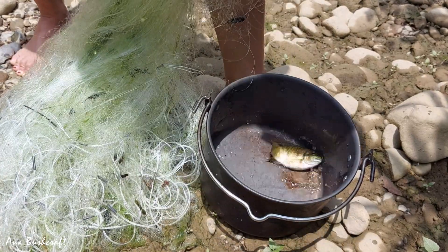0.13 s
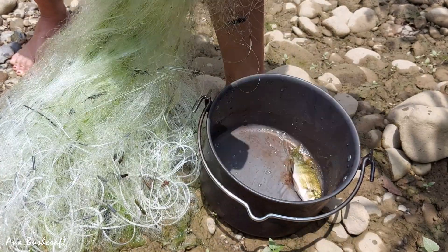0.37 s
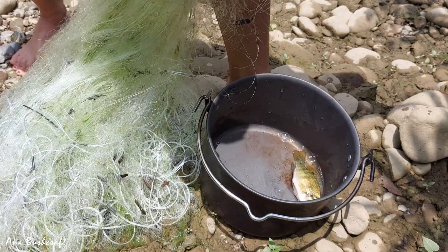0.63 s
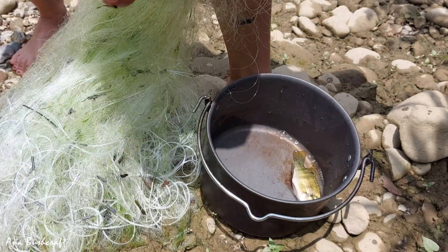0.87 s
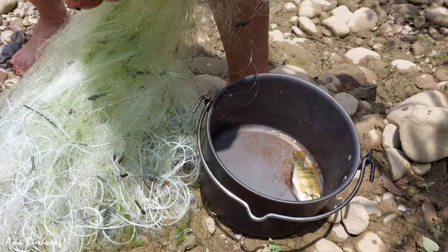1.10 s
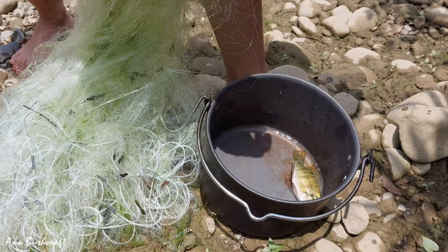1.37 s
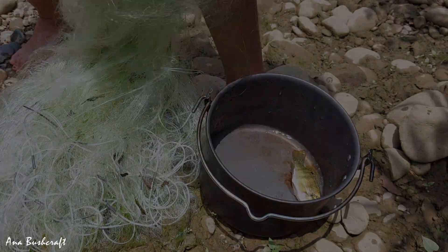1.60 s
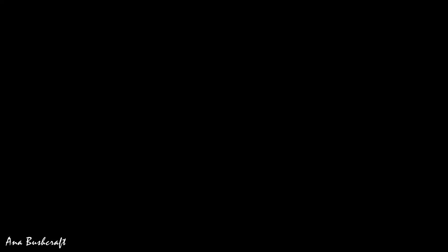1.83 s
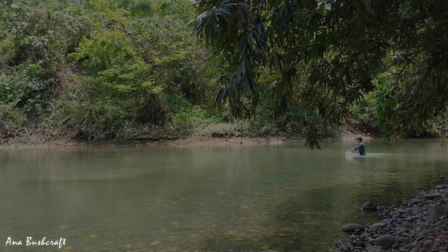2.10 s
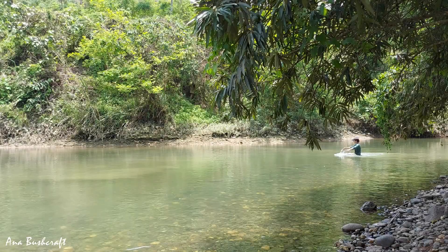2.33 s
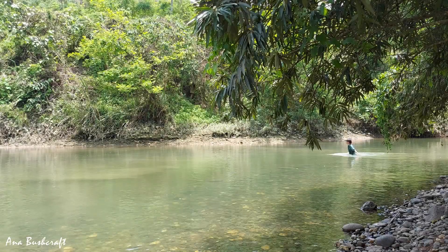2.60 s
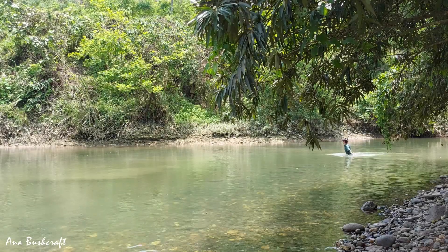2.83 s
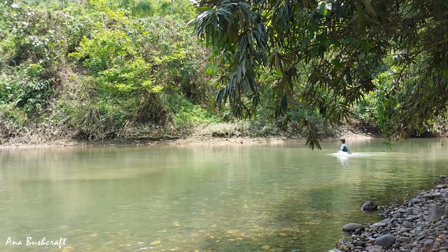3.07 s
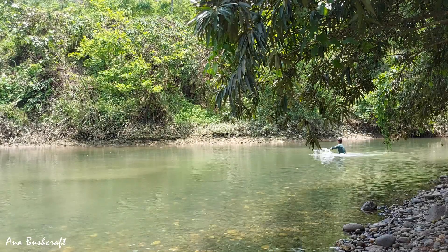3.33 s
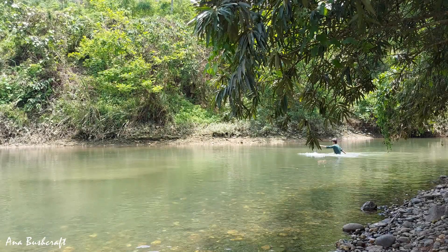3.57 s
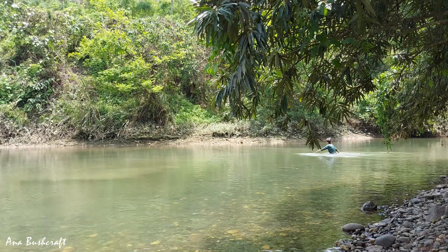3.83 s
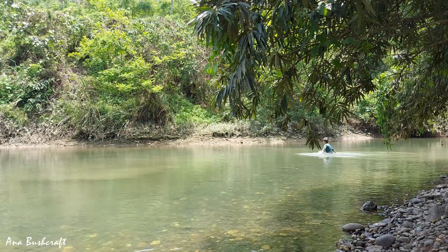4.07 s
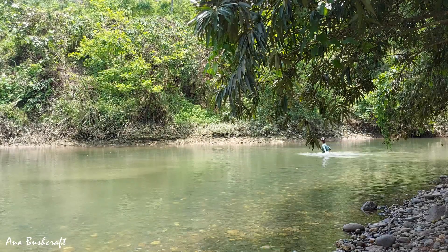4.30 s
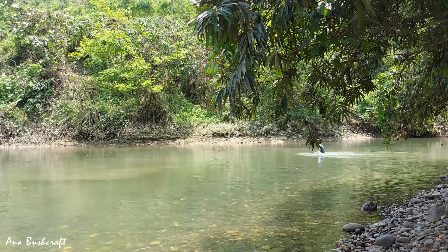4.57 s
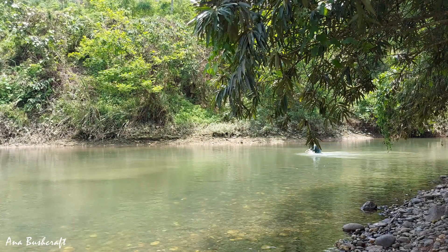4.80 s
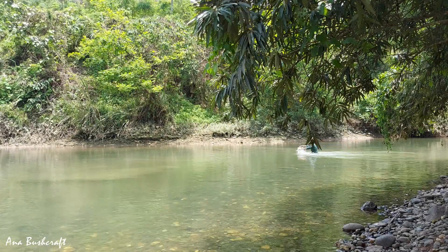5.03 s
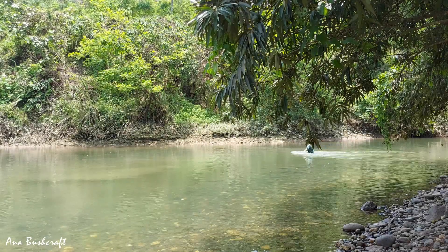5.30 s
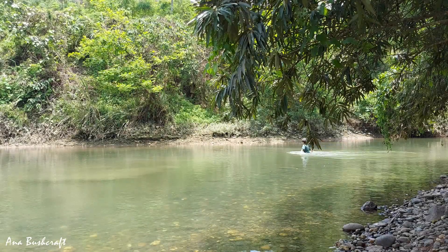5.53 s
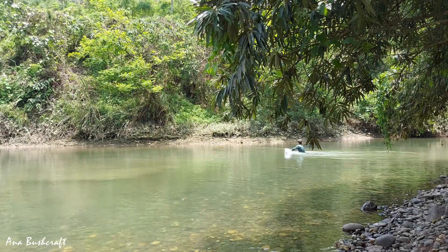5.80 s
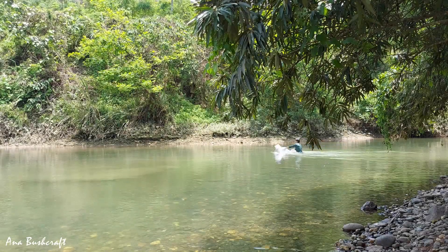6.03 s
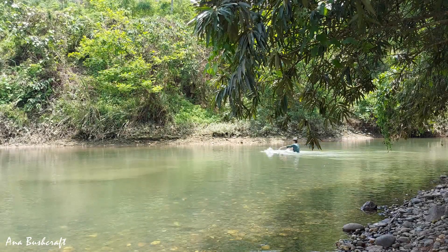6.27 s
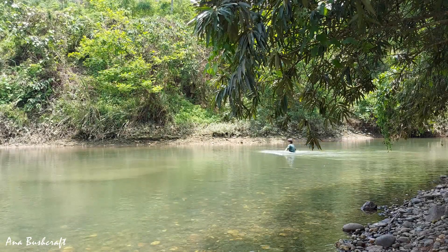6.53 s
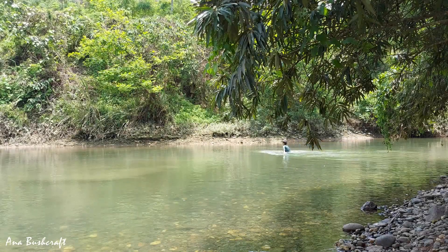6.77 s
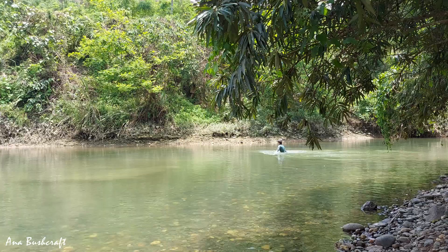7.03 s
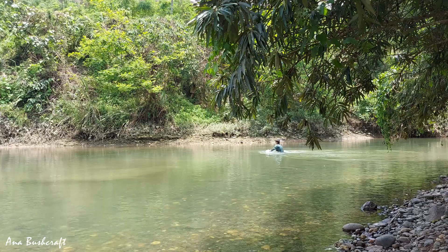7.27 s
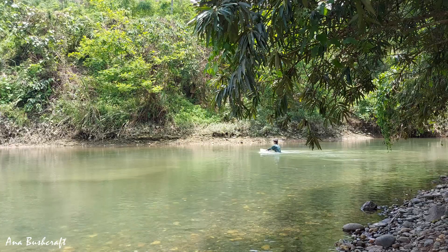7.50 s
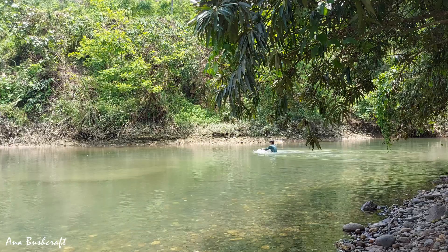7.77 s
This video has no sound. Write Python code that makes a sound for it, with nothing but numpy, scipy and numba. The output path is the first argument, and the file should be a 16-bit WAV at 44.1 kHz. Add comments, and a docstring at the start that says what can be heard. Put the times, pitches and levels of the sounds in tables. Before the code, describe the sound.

A small fish flaps hard in a metal pot as birds whistle and a net rustles, then distant wading sloshes and gurgles in a river.

```python
"""A stony river bank, then a wide view of the river.
On the bank a small fish flaps in a metal pot (ringing modes and wet noise slaps), birds whistle in the trees
(gliding sines with echoes) and a net scrapes and rustles (bursts of filtered noise). At the river someone wades
and works a net far off: clouds of bubble rings glug, slosh, fizz and spray while birds still call.
Shaped noise gives each place its hush, a thin cricket band throughout and an insect hiss over the river."""
import sys
import numpy as np
from scipy import signal
from scipy.fft import rfft, irfft
from scipy.io import wavfile
from scipy.ndimage import uniform_filter1d
from numba import njit

SR = 44100
rng = np.random.default_rng(int(sys.argv[2]) if len(sys.argv) > 2 else 0)


def elevation(decibels):
    """Turn decibel levels (scalar or array-like) into linear amplitude ratios."""
    levels = np.asarray(decibels, float)
    return 10 ** (levels / 20)


def bounce(signal):
    """Save signal as a 16-bit WAV file at the path given by the first command-line argument."""
    frames = np.transpose(np.atleast_2d(signal))
    limited = np.clip(frames, -1, 1)
    pcm = np.round(limited * 32767).astype(np.int16)
    wavfile.write(sys.argv[1], SR, pcm)


N = 347508
T = np.arange(N) / SR
CUT_S = 1.866  # the scene changes from the bank to the river


def unit(x):
    """Normalisation: scale to an rms of one."""
    return x / np.sqrt(np.mean(x ** 2))


def band(x, lo_hz, hi_hz, order=2):
    """Band-pass filtering: keep the spectrum between two corner frequencies."""
    corners = [lo_hz, min(hi_hz, .45 * SR)]
    return signal.sosfilt(signal.butter(order, corners, "bandpass", fs=SR, output="sos"), x)


def colour(x, points):
    """Spectral shaping: weight noise by (frequency [Hz], level [dB]) points, joined on a log axis."""
    hz, db = np.transpose(points)
    f = np.fft.rfftfreq(x.shape[-1], 1 / SR) + 1
    gain = elevation(np.interp(np.log(f), np.log(hz), db))
    return unit(irfft(rfft(x) * gain, x.shape[-1]))


def curve(table):
    """Envelopes: interpolate level columns in dB, near silent before the table, then holding its last value."""
    s, *columns = np.transpose(table)
    return [elevation(np.interp(T, s, db, left=-140)) for db in columns]


def bursts(rows):
    """Incoherent addition: events swell to a peak, decay exponentially, and their powers add."""
    power = 0
    for s, db, rise, t60 in rows:
        swell = np.clip(1 + (T - s) / (2 * rise), 0, 1) ** 2
        decay = np.exp(-np.log(1000) * np.maximum(T - s, 0) / t60)
        power = power + (elevation(db) * swell * decay) ** 2
    return np.sqrt(power)


def waver(rate_hz, depth_db):
    """Slow amplitude modulation: a smoothed random gain of the given rms depth."""
    k = int(SR / rate_hz)
    steps = rng.standard_normal(800).repeat(k)[:N]
    return elevation(depth_db * unit(uniform_filter1d(steps, k)))


def pan(x, db=0., lag=0):
    """Stereo cues: a level difference, left minus right, and a delay of the left by lag samples."""
    return np.array([np.roll(x, lag) * elevation(db / 2), x * elevation(-db / 2)])


def scatter(x, t60, build=0.003):
    """Diffuse scattering: many small echoes from leaves and banks build up and decay, unlike at each ear."""
    t = T[:int(.5 * SR)]
    envelope = np.exp(-np.log(1000) * t / t60) * (1 - np.exp(-t / build))
    tail = rng.standard_normal((2, len(t))) * envelope
    tail /= np.sqrt(np.sum(tail ** 2) / 2)
    return signal.fftconvolve(np.atleast_2d(x), tail, axes=1)[:, :N]


def stereo_noise(like_hz):
    """Interaural coherence: noise alike in both channels in the bass and unrelated in the treble."""
    mid, side = rng.standard_normal((2, N))
    side = signal.sosfilt(signal.butter(1, like_hz, "highpass", fs=SR, output="sos"), side)
    return np.array([mid + side, mid - side])


@njit
def rings(count, start, hz, t60, size, glide, swell, sr):
    """Damped oscillation: rings swell over some cycles; a bubble rises in pitch as it nears the surface."""
    out = np.zeros(count)
    for k in range(len(start)):
        n = int(t60[k] * sr)
        step, level, phase = 2 * np.pi * hz[k] / sr, size[k], 0.
        fade, rise = np.exp(-np.log(1000.) / n), (1 + glide[k]) ** (2 / n)
        for i in range(start[k], min(start[k] + n, count)):
            out[i] += level * np.sin(phase) * min(phase / (2 * np.pi * swell), 1.)
            phase += step
            level *= fade
            step = min(step * rise, 2.6)  # stays below half the sample rate
    return out


def ring(s, hz, t60, size, glide, swell):
    """Superposition: sum damped rings whose settings may each be one value or one per ring."""
    hz = np.asarray(hz, float)
    one = np.ones(len(hz))
    start = (s * SR * one).astype(np.int64)
    return rings(N, start, hz, np.maximum(t60 * one, .001), size * one, glide * one, swell, float(SR))


def froth(count, hz, octaves, cycles, spread_db, glide):
    """Bubble acoustics: a cloud of rings at random moments and sizes around a moving pitch."""
    when, up, size_draw, life, down = rng.random((count, 5)).T
    s = CUT_S + when * (T[-1] - CUT_S)
    centre_hz = (hz * np.ones(N))[(s * SR).astype(int)]
    pitch = np.minimum(centre_hz * 2 ** (octaves * (up - down)), .36 * SR)
    # a few bubbles are much larger than the rest
    size_db = np.minimum(-spread_db * np.log(size_draw + 1e-9), 4 * spread_db)
    size = elevation(size_db) * np.sqrt(pitch)  # short high rings count as much as long low ones
    return unit(ring(s, pitch, cycles * (.5 + life) / pitch, size, glide * life, swell=0.9))


def air():
    """Broadband ambience: shaped noise is each place's hush; narrow bands are cricket and insect hiss."""
    # spectrum of the hush on the bank: (frequency [Hz], density [dB per Hz])
    bank_shape = [(15, -40), (25, -7.5), (114, 0), (200, -11), (309, -6.5), (489, -14.5), (796, -15.5),
                  (2840, -21), (3920, -9), (4490, -13.5), (5570, -2), (7310, -21), (7920, -13),
                  (14000, -12), (16000, -23)]
    # spectrum of the hush at the river: (frequency [Hz], density [dB per Hz])
    river_shape = [(15, -43), (25, -16), (64, 8), (256, -2.5), (344, 8), (405, -13), (1330, 12.5),
                   (3340, 2), (4740, 7), (6210, -10.5), (6740, -42), (7710, -13), (8590, 3.5), (11900, -8),
                   (16000, -30)]
    # swelling insect hiss: (time [s], upper band level [dB], lower band level [dB])
    hiss_levels = [(1.87, -81.5, -67), (2.38, -87.5, -74), (2.52, -91, -72), (2.8, -97, -80.5),
                   (3.24, -90, -75), (3.56, -81.5, -77), (3.89, -105, -88), (4.24, -87, -75),
                   (4.44, -84.5, -63.5), (4.8, -81, -65.5), (5.25, -68, -63), (5.72, -68.5, -64),
                   (6.3, -67, -58), (6.57, -66.5, -63), (6.89, -66.5, -65), (7.88, -63.5, -67)]
    bank = elevation(-61.5) * colour(stereo_noise(150), bank_shape)
    river = elevation(-58.5) * colour(stereo_noise(130), river_shape)
    upper, lower = curve(hiss_levels)
    hiss = upper * unit(band(rng.standard_normal((2, N)), 15000, 15750))
    hiss += lower * unit(band(rng.standard_normal((2, N)), 10000, 14800))
    cricket_hz, cricket_db = 8560, -80
    cricket = unit(band(rng.standard_normal((2, N)), cricket_hz - 300, cricket_hz + 300))
    hiss_side = elevation(np.array([[-2.5], [2.5]]))  # stronger on the right
    return np.where(T < CUT_S, bank, river) + elevation(cricket_db) * cricket + hiss * hiss_side


def fish():
    """Modal excitation: each flap rings the pot, higher modes for harder blows, and leaves a bright wet slap."""
    # blows of the fish: (time [s], slap level [dB], pot ring level [dB], slap t60 [s],
    #                     left minus right of the slap [dB], hardness [dB per octave])
    flaps = [(.0005, -24.5, -29.5, 0.075, -0.5, -8.5), (0.025, -43, -34, 0.32, -2.5, -1.5),
             (0.0425, -29.5, -35.5, 0.038, -3, -2.5), (0.1316, -33.5, -38, 0.062, 1, -1.5),
             (0.144, -35.5, -47, 0.045, 1, -2), (0.1596, -21.5, -37.5, 0.061, 1, -2.5),
             (0.1922, -9, -17, 0.014, -4.5, 3), (0.2615, -36, -40.5, 0.057, -2, 6.5),
             (0.2673, -28, -51, 0.04, 2, 1.5), (0.317, -63, -54.5, .05, -11, 7)]
    # modes of the metal pot: (frequency [Hz], level [dB], t60 [s])
    pot_modes = [(286, -23, 0.33), (323, -9.5, 0.16), (339, -21, 0.12), (517.4, -7.5, 0.095),
                 (546, -18, 0.25), (780, -21.5, 0.16), (875, -21.5, 0.11), (1182, -10.5, 0.088),
                 (1224, -10.5, 0.11), (1340, -19.5, 0.042), (1592, -23.5, .05), (1803, -13, 0.066),
                 (2075, -13.5, 0.032), (2504, -18, .04), (2655, -13, 0.039), (2760, -19, 0.0211),
                 (3110, -20, 0.084), (3300, -30, .04)]
    # spectrum of the wet slap: (frequency [Hz], density [dB per Hz])
    slap_shape = [(710, -39), (1200, -2), (1660, -13.5), (2620, -4.5), (4650, -12.5), (5780, -9),
                  (6230, -14.5), (9310, -2.5), (11900, -3), (16000, -5.5)]
    out = np.zeros((2, N))
    hz, mode_db, t60 = np.transpose(pot_modes)
    shared = rng.standard_normal(N)
    slap = colour(shared + elevation(8) * rng.standard_normal((2, N)), slap_shape)
    slap *= elevation(0.38 * rng.standard_normal(N // 64 + 1)).repeat(64)[:N]  # the wet skin sputters
    for s, db, pot_db, slap_t60, pan_db, hard_db in flaps:
        after = np.maximum(T - s, 0)
        decay = np.exp(-np.log(1000) * after / slap_t60)
        weak_tail = elevation(-28.5) * np.exp(-after / 0.029)
        out += elevation(db) * slap * pan((T >= s) * (decay + weak_tail), pan_db)
        tilt_db = hard_db * np.log2(hz / 1000)
        struck = elevation(pot_db + mode_db + tilt_db + 0.78 * rng.standard_normal(len(hz)))
        out += pan(ring(s, hz, t60, struck, 0, swell=0.43), 2.0)
    return band(out, 130, 22000, order=1)


def birds():
    """Frequency glides: near-sine whistles, which the trees smear, the far ones almost wholly."""
    # kinds of whistled note: (length [s], from [Hz], to [Hz], bend [over 1 levels off, under 1 lingers at the
    #   start], loudest at [share 0-1], direct level [dB], left minus right [dB], echo t60 [s])
    note_kinds = [(0.115, 4000, 6200, 1.2, 0.21, -12.5, -1, 0.33),
                  (0.086, 3400, 7680, 1.3, 0.66, -6, -2.5, 0.1),
                  (0.036, 3500, 7650, 1.4, 0.77, 0, -5, 0.14), (.12, 5990, 5920, 1.1, 0.15, -20, 3, 0.4),
                  (.1, 6480, 8800, 0.398, 0.05, -16, -4.5, 0.69),
                  (0.06, 6000, 4300, 1.4, 0.15, -20, -2, 0.73), (0.095, 4640, 4570, 2.1, 0, -25, -6, 0.26)]
    # phrases of repeated notes: (first note [s], gap [s], growth of each gap [s], first level [dB], last level [dB])
    phrases = [(.078, .1275, .0003, -50.5, -53), (1.322, 0.136, 0.0029, -45, -49), (1.203, .1, 0, -51, -50),
               (2.199, .1, 0, -51.5, -51.5), (2.288, .154, .004, -53.5, -53), (3.45, .17, .07, -58, -54),
               (2.335, .155, .005, -50.5, -51.5), (3.96, .1, 0, -51, -50), (2.685, .166, 0.0056, -64, -60),
               (3.42, .28, 0, -54, -53.5), (3.77, .11, -.002, -59, -59.5)]
    # kind of note in each phrase: (row of note_kinds)
    phrase_kind = [0, 1, 2, 3, 4, 4, 5, 5, 6, 6, 6]
    # length of each phrase: (number of notes)
    phrase_notes = [11, 4, 1, 1, 7, 3, 6, 1, 4, 2, 5]
    warble_hz, flutter_db = 44.7, 3.5  # rms; far birds' notes wobble in pitch and are mottled in level
    wobble = unit(band(rng.standard_normal(N), 45, 480))
    flutter = unit(band(rng.standard_normal(N), 16, 60))
    out = 0
    for kind, (length, from_hz, to_hz, bend, loudest, direct_db, pan_db, t60) in enumerate(note_kinds):
        song = np.zeros(N)
        u = np.arange(int(length * SR)) / int(length * SR)
        peak_warp = np.log(.5) / np.log(np.maximum(loudest, .05))
        shape = np.sin(np.pi * u ** peak_warp) ** 1.07
        glide_hz = to_hz + (from_hz - to_hz) * (1 - u) ** bend
        far = direct_db < -12
        for (first, gap, longer, first_db, last_db), which, notes in zip(phrases, phrase_kind, phrase_notes):
            if which != kind:
                continue
            for k, db in enumerate(np.linspace(first_db, last_db, notes)):
                i = int((first + k * gap + longer * k * (k - 1) / 2) * SR)
                span = slice(i, i + len(u))
                hz = glide_hz + warble_hz * far * wobble[span]
                level = elevation(db + flutter_db * far * flutter[span])
                song[span] += level * shape * np.sin(2 * np.pi * np.cumsum(hz) / SR)
        heard = elevation(direct_db) * pan(song) + scatter(song, t60, build=0.00091)
        on_bank = phrases[phrase_kind.index(kind)][0] < CUT_S
        out = out + heard * pan((T < CUT_S) == on_bank, pan_db)  # each kind is heard in one place only
    return out


def net():
    """Friction noise: nylon mesh drags over stones in low scrapes, then crackles crisply."""
    # low scrapes: (time of peak [s], level [dB], half of the rise [s], t60 [s])
    drags = [(.36, -66, 0.0047, .08), (.426, -59.5, 0.013, 0.35), (.5, -64.5, .01, 0.48),
             (.55, -63, 0.011, 0.36), (.625, -66.5, .01, 0.23), (.67, -68, .01, .3),
             (.936, -59, 0.0071, 0.25), (1.026, -64.5, 0.026, 0.16)]
    # crisp crackles: (time of peak [s], level [dB], half of the rise [s], t60 [s])
    crackles = [(1.518, -47.5, .015, .08), (1.57, -52, 0.018, .3), (1.626, -56, .03, 0.24)]
    grain_db = 4.95 * rng.standard_normal((2, 1, N // 128 + 1))
    grit = rng.standard_normal((2, 2, N)) * elevation(grain_db).repeat(128, axis=2)[..., :N]
    scrape = bursts(drags) * unit(band(grit[0], 730, 1970))
    return scrape + bursts(crackles) * unit(band(grit[1], 9000, 14000))


def wading():
    """Bubble resonance: big bubbles glug, middle ones slosh, tiny ones fizz; droplets patter as spray."""
    # how hard the water is stirred: (time [s], slosh level [dB], fine fizz level [dB], slosh pitch [Hz])
    stirring = [(1.87, -55, -69, 693), (2.0, -58.5, -58, 520), (2.08, -59.5, -61, 990),
                (2.37, -55.5, -56, 1155), (2.5, -60, -57.5, 1250), (2.62, -69.5, -93, 990),
                (2.82, -66.5, -94, 1004), (2.97, -58, -61, 802), (3.28, -59.5, -61.5, 1010),
                (3.47, -55.5, -53.5, 1124), (3.66, -51.5, -50.5, 1460), (3.76, -64, -61.5, 887),
                (4.07, -72.5, -87, 1005), (4.131, -56, -83, 920), (4.28, -62.5, -57.5, 1225),
                (4.38, -57, -61, 1080), (4.45, -50, -55.5, 1120), (4.7, -56, -61, 800),
                (4.86, -55, -56.5, 616), (5.03, -54, -60.5, 1190), (5.13, -61.5, -58.5, 613),
                (5.27, -56, -60, 1068), (5.52, -64, -59.5, 1156), (5.771, -52, -56.5, 583),
                (5.84, -51, -55.5, 1000), (6.08, -52.5, -55, 1095), (6.35, -51, -47, 1100),
                (6.47, -54, -50, 1260), (6.6, -57, -59, 1007), (6.93, -61.5, -66, 990),
                (7.071, -49.5, -60, 510), (7.29, -59, -61.5, 1011), (7.5, -58.5, -56, 853),
                (7.88, -51.5, -56.5, 1113)]
    # gulps of deep bubbles: (time of peak [s], level [dB], pitch [Hz], half of the rise [s], t60 [s])
    gulps = [(1.875, -55.5, 343, .005, 0.32), (2.0, -54, 295, .08, 0.36), (2.22, -59.5, 360, 0.048, 0.25),
             (2.35, -62, 377, .03, 1.14), (3.0, -75, 354, 0.11, 1.2), (3.32, -64, 282, 0.065, .4),
             (3.74, -62.5, 402, 0.15, 0.17), (4.44, -60.5, 400, 0.079, 0.8), (4.52, -62.5, 362, 0.038, 1.2),
             (4.86, -56.5, 240, 0.092, 1.16), (5.11, -61.5, 346, 0.032, 1), (5.7, -70, 374, 0.068, 0.18),
             (5.78, -58, 370, 0.047, 0.42), (5.85, -55.5, 240, .02, 2), (6.1, -55, 220, 0.084, 1.34),
             (6.35, -67, 398, .1, 2.3), (7.07, -54.5, 390, 0.069, 0.56), (7.15, -59, 295, .04, 0.39),
             (7.48, -57.5, 307, 0.15, 0.66), (7.7, -65, 352, 0.06, 0.77)]
    # splashes that throw droplets: (time of peak [s], relative level [dB], half of the rise [s], t60 [s])
    splashes = [(2.0, -67, 0.16, 1.5), (2.36, -58.5, 0.042, 1.1), (2.79, -66.5, 0.065, 0.56),
                (2.99, -64.5, .05, 1.4), (3.4, -56.5, .1, 1.5), (3.54, -52, 0.12, 1.3),
                (3.98, -58.5, .06, 0.2), (4.08, -67, .03, 3.3), (4.28, -66.5, .04, .8),
                (4.51, -56.5, .05, 0.48), (4.86, -68, 0.23, 1), (5.25, -68, .06, 0.54),
                (5.47, -65, 0.048, .4), (5.84, -63, .03, 1.5), (6.1, -66.5, 0.066, 1.5),
                (6.42, -57, .12, 0.96), (7.51, -71, .03, .6), (7.86, -71.5, .08, 1.1)]
    # single bubbles, drips and deep pockets of air: (time [s], relative level [dB], starting pitch [Hz])
    bubbles = [(1.878, -38, 693), (1.93, -39, 630), (1.965, -43, 374), (2.035, -42, 527),
               (2.055, -38, 1250), (2.148, -36, 1195), (2.2, -36.5, 800), (2.219, -41, 1350),
               (2.26, -41, 1250), (2.296, -39, 1440), (2.354, -38, 1150), (2.499, -40, 1700),
               (2.526, -37, 960), (2.913, -44.5, 480), (3.315, -41.5, 510), (3.373, -45, 1290),
               (3.391, -35, 1710), (3.558, -32, 2030), (3.609, -31, 1710), (3.955, -47, 640),
               (4.13, -40.5, 886), (4.313, -37, 1300), (4.428, -29, 1335), (4.469, -36, 765),
               (4.514, -32, 1000), (4.643, -38, 1200), (4.686, -42, 460), (4.749, -49, 148),
               (4.794, -45, 161), (4.845, -46, 258), (4.86, -39.5, 254), (5.099, -44, 394),
               (5.216, -40.5, 473), (5.401, -44, 1920), (5.6, -34.5, 1340), (5.775, -35, 367),
               (5.82, -42, 201), (5.897, -41, 224), (5.997, -47, 220), (6.081, -31, 1310),
               (6.092, -40, 181), (6.179, -52, 275), (6.6, -40, 930), (6.646, -37, 848),
               (6.809, -39.5, 662), (7.016, -50, 386), (7.06, -41.5, 410), (7.139, -34, 632),
               (7.149, -43, 220), (7.575, -42.5, 208), (7.793, -43, 685)]
    # droplet ticks and plops: (time [s], relative level [dB], starting pitch [Hz], t60 [s])
    ticks = [(2.7576, -43, 6600, 0.003), (2.9971, -28.5, 7000, 0.0019), (3.3, -28.5, 2130, 0.01),
             (3.304, -40, 1600, .008), (4.267, -33.5, 2190, 0.012), (6.193, -31, 1250, 0.015),
             (3.3326, -31, 5960, 0.0063), (3.7529, -40.5, 10800, 0.003), (3.8023, -35, 6900, 0.0037),
             (3.9597, -30, 5500, 0.0019), (4.241, -37, 9460, 0.0033), (4.412, -37.5, 12960, 0.003),
             (5.224, -45, 12300, 0.003), (5.4849, -37.5, 9700, 0.003)]

    s, slosh_db, fizz_db, hz = np.transpose(stirring)
    slosh, fizz = curve(np.transpose([s, slosh_db, fizz_db]))
    slosh_hz = np.interp(T, s, hz)
    # any stirring throws some droplets, splashes throw more
    spray = np.hypot(elevation(-11.5) * fizz, elevation(3.5) * bursts(splashes))
    s, db, hz, rise, t60 = np.transpose(gulps)
    deep = bursts(zip(s, db, rise, t60)) * (T > CUT_S)
    deep_hz = np.interp(T, s, hz)

    lap_hz, lap_db = 16, 1.5  # small waves make the level waver
    water = deep * froth(count=1200, hz=deep_hz, octaves=0.48, cycles=11.8, spread_db=1.1, glide=0.345)
    middle = froth(count=3500, hz=slosh_hz, octaves=1.484, cycles=17, spread_db=3.5, glide=0.584)
    water += slosh * waver(lap_hz, lap_db) * middle
    tiny = froth(count=12000, hz=2800, octaves=1.446, cycles=18.2, spread_db=3.5, glide=0.66)
    water += fizz * waver(lap_hz, lap_db) * tiny

    s, db, hz = np.transpose(bubbles)
    cycles = 23 + 1.6 * np.log2(hz / 1000)  # until 60 dB down; smaller bubbles ring for more cycles
    single = ring(s, hz, cycles / hz, elevation(db), 0.1, swell=2.2)
    s, db, hz, t60 = np.transpose(ticks)
    single += ring(s, hz, t60, elevation(db), 0.057, swell=0.17)
    drops = np.array([froth(count=25000, hz=7360, octaves=1.305, cycles=8.1, spread_db=2.1, glide=0.044)
                      for _ in range(2)])

    direct = pan(water + single, 2.1, lag=5) + spray * drops
    echo = scatter(water + single, t60=0.26)
    return band(elevation(-1.0) * direct + elevation(-7) * echo, 87, 17000, order=3)


def scene():
    """Superposition: the pressures of all sources add."""
    return air() + fish() + birds() + net() + wading()


def band_limit(x):
    """A steep low-pass at the top of the band."""
    return signal.sosfilt(signal.butter(12, 15900, fs=SR, output="sos"), x)


def record(dry):
    """Signal chain: takes the summed sources as the finished mix and returns its recorded form."""
    return band_limit(dry)


dry = scene()
out = record(dry)
bounce(out)
```